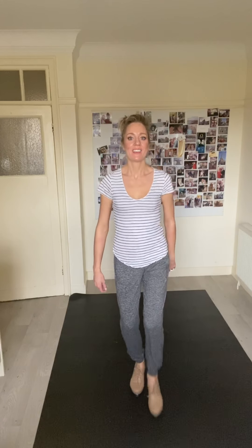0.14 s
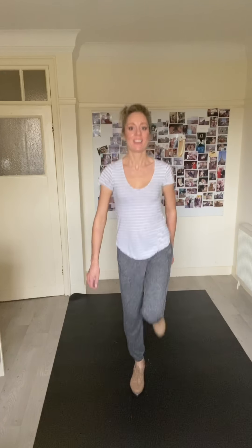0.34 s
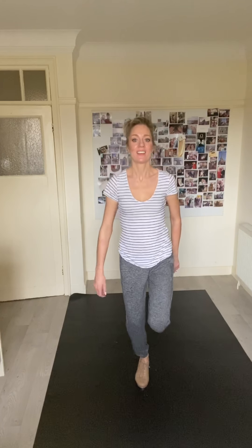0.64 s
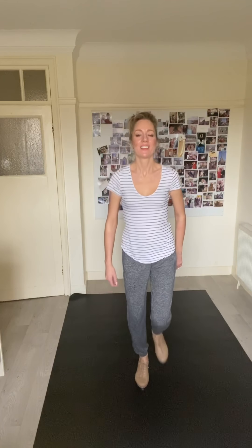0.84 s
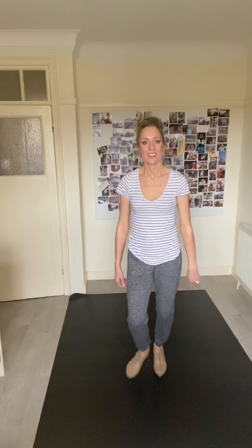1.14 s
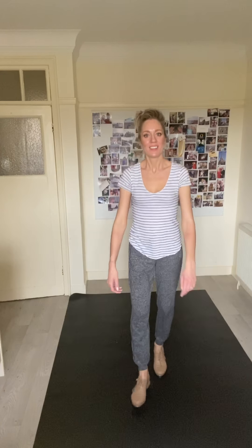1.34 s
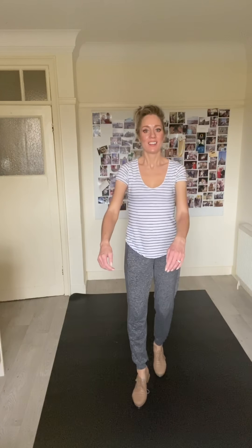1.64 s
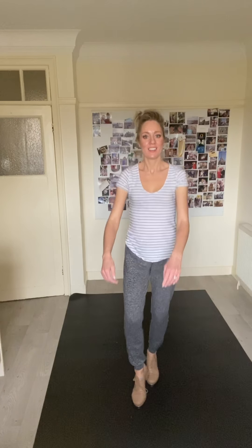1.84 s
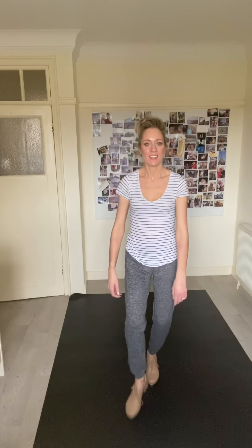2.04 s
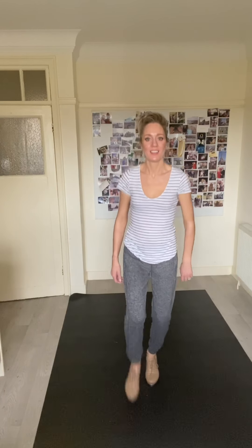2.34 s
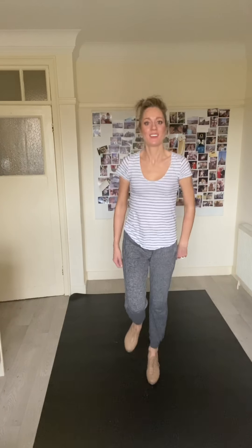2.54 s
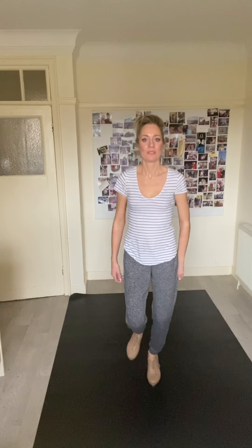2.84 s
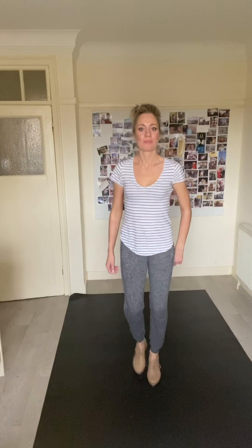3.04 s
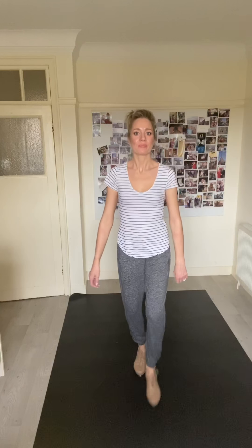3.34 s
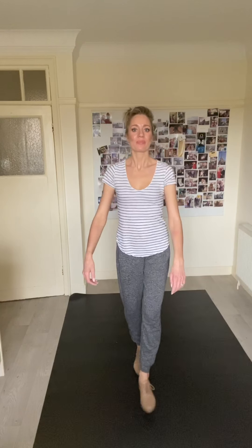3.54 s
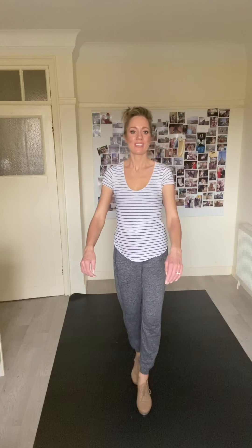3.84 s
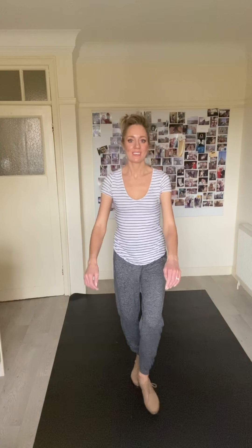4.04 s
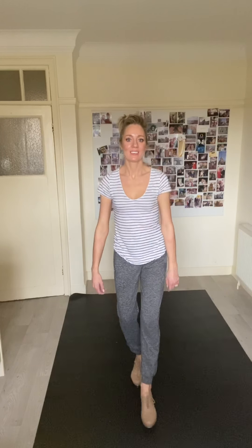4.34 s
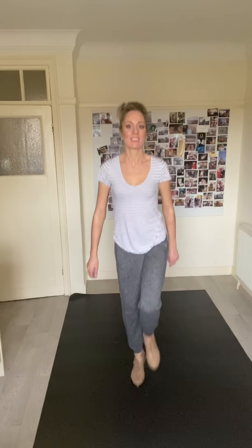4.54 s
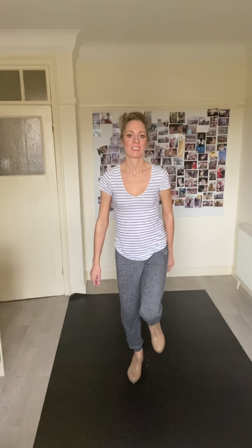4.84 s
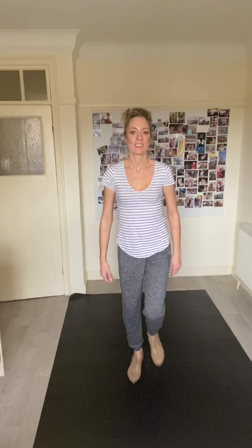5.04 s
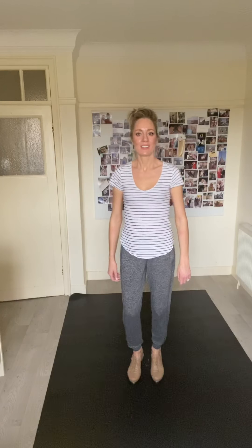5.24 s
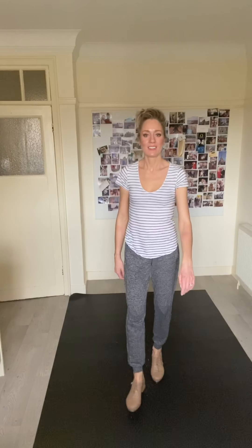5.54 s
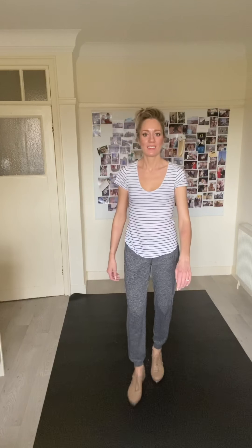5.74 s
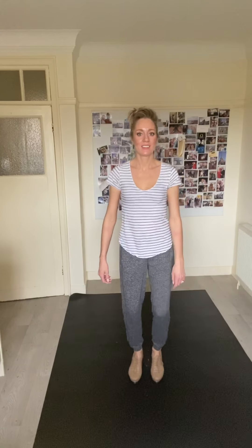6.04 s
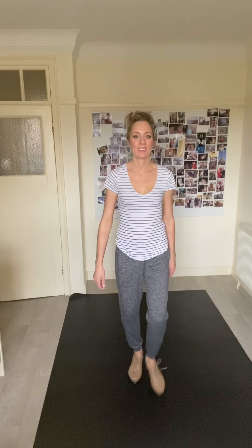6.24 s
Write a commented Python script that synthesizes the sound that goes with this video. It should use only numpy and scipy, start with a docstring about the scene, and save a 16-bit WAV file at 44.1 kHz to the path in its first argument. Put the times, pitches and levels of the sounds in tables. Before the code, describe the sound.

A dancer in tap shoes steps on a mat over a wooden floor in a small bare room. Single clacks come roughly every quarter second, with a few half-second gaps. Each has a crisp metal and leather snap, a boomy board thump and a short reverberant tail. A light brush and a soft landing thud come early and again late. A phone listens from a few metres away over a faint rumble.

```python
"""Tap shoes on a mat

A dancer in tap shoes steps on a mat over a wooden floor in a small bare room, a few metres from a phone.
Each blow clacks the metal plate and leather sole and shakes the boards; now and then her full weight lands.
Shoe and mat sounds are colours sent through random echoes; the floor is a set of fading sine waves.
The walls answer more loudly than the direct sound, over a faint house rumble, into two close microphones."""
import sys
import numpy as np
from scipy import signal
from scipy.fft import rfft, irfft
from scipy.io import wavfile

SR = 44100
rng = np.random.default_rng(int(sys.argv[2]) if len(sys.argv) > 2 else 0)


def inscribe(sig):
    """Save sig as 16-bit PCM at rate SR to the path in sys.argv[1].

    A 1-D sig is mono; a 2-D sig holds one channel per row.
    Samples are clipped to [-1, 1] before scaling.
    """
    pcm = np.round(np.clip(np.atleast_2d(sig).T, -1, 1) * 32767)
    wavfile.write(sys.argv[1], SR, pcm.astype(np.int16))


N = 281338

RING = np.arange(2 ** 15) / SR  # time after a blow (s)
RING_HZ = np.arange(len(RING) // 2 + 1) * SR / len(RING)  # pitches in the spectrum of that stretch

# Each blow's strength, then how far each part of the shoe stands out above it:
# [start_s, strength_db, body_weight_db, sole_clack_db, plate_ring_db, edge_tick_db]
TAPS = [(-.085, 17.5, -2, 7.5, -2, 8.5), (0.1708, 17.5, -2.5, 6, -0.5, 10), (.47, 14.5, 0, 3.5, 7.5, 7),
        (0.9697, 15, 4.5, 7, -0.5, 9), (1.2514, 16.5, 7, -2, 10.5, 9), (1.5107, 22.5, -3.5, -1, 5.5, 7.5),
        (1.7834, 18, -1.5, -5.5, -5, 3.5), (2.0226, 18.5, -8, 1.5, -2, -0.5),
        (2.2779, 27, 4, -1.5, -6.5, 1.5), (2.528, -3, 0.5, 3, -1.5, -2), (2.585, 18, 6, 4.5, 0.5, 5.5),
        (3.068, 25.5, -5.5, 0.5, -1, 4), (3.347, 18.5, -8, -3.5, 1, -3.5),
        (3.59, 28.5, -1.5, -0.5, 3, -0.5), (3.859, 21.5, -9, -9, -5, -3.5),
        (4.1192, 17, -11.5, 0, -3.5, .5), (4.3794, 25.5, 1, 0, -3, 4.5), (4.672, 11, 4.5, 2.5, -2, -2.5),
        (5.1663, 21, 4.5, 11, -1, 7.5), (5.4646, 21.5, -6, 2, -1, -6), (5.7516, 17.5, 2.5, .5, 6.5, 9.5),
        (5.9928, 21.5, 2.5, -5, 1, -2), (6.281, 18, -1.5, 3, -4.5, 4.5)]
# Ordinary sound of a shoe on the mat: [pitch_hz, level_db]
SHOE_COLOUR = [(60, -36), (160, -3.5), (240, -10), (350, -7), (520, -4.5), (800, -5), (1200, -1),
               (1900, 0.5), (2700, -4), (4200, -7.5), (5400, -16.5), (8500, -19.5), (11000, -25),
               (13500, -30.5), (15500, -37)]
# Short rings of the metal plates: [pitch_hz, width_hz, rise_db]
PLATE_RINGS = [(1146, 35, 3), (1585, 54, 4), (2460, 12, 6.5), (2680, 59, 1), (3393, 29, 6), (4003, 60, 3.5),
               (4480, 29, 5), (7040, 580, 3), (8280, 63, 6)]
# Where the weighted heel, sole, plate and edge speak, in that order: [pitch_hz, width_hz]
SHOE_PARTS = [(250, 550), (1830, 880), (3650, 3100), (10600, 7900)]


def taps():
    """Each blow rings heel, sole, plate and edge in its own measure, and fills the room."""
    out = np.zeros((2, N))
    shoe_db = curve(RING_HZ, SHOE_COLOUR)
    for hz, width_hz, rise_db in PLATE_RINGS:
        shoe_db = shoe_db + rise_db * resonance(hz, width_hz)
    parts = np.array([resonance(hz, width_hz) for hz, width_hz in SHOE_PARTS])
    for start_s, strength_db, *part_db in TAPS:
        colour_db = shoe_db + np.dot(part_db, parts) + strike_ripple()
        add(out, start_s, undb(strength_db) * heard(colour_db))
    return out


def strike_ripple(depth_db=4.5, width_share=0.043, count=36):
    """Where the plate is struck favours some of its many short modes and misses others (dB)."""
    place = rng.random((count, 1))
    size = rng.uniform(-1.04, 1, (count, 1))
    hz = 900 * 15 ** place  # from 900 to 13500 Hz
    return np.sum(depth_db * size * resonance(hz, width_share * hz), axis=0)


# The other shoe brushes the mat: [start_s, level_db, length_s]
BRUSHES = [(0.382, 2.5, 0.14), (4.598, 3.5, 0.1)]


def brushes():
    """A grazing shoe makes a short run of tiny contacts, each with the shoe's ordinary sound."""
    out = np.zeros((2, N))
    for start_s, level_db, length_s in BRUSHES:
        swell = RING * np.exp(-2 * RING / length_s)
        contacts = unit(rng.laplace(size=(1, len(RING))) * swell)
        shoe = heard(curve(RING_HZ, SHOE_COLOUR))
        add(out, start_s, undb(level_db) * signal.fftconvolve(contacts, shoe))
    return out


# The body's weight comes down or pushes off; the floor uses these too: [start_s, push_db, push_length_s]
LANDINGS = [(0.357, -41, 0.0066), (0.497, -18, 0.016), (1.3, -25, 0.014), (1.818, -28, 0.011),
            (2.30, -32, .01), (3.875, -35.5, 0.0039), (4.586, -29.5, 0.0183), (4.706, -15.5, 0.0086)]
# Muffled thud of the mat under a landing: [pitch_hz, level_db]
MAT_COLOUR = [(30, -24), (70, -7), (130, -0.5), (250, -15), (450, -22), (800, -35), (2000, -44.5),
              (8000, -89)]


def mat(thud_db=56.5, stiffening=1.43):
    """The mat slaps dully under a landing; it stiffens under load, so gentle pushes stay almost silent."""
    out = np.zeros((2, N))
    for start_s, push_db, _ in LANDINGS:
        # stiffening: dB of slap per dB of push
        add(out, start_s, undb(stiffening * push_db + thud_db) * heard(curve(RING_HZ, MAT_COLOUR)))
    return out


# Bending modes of the boards; t60 is the time to fade by 60 dB: [pitch_hz, level_db, t60_s, build_up_s]
BOARDS = [(80.4, 1, 0.18, 0.0037), (97.3, -2, 0.41, 0.021), (129.9, 1, .2, 0.007),
          (143.6, -3, 0.46, 0.0074), (157.5, -9.5, 0.82, 0.0091), (178.6, -11.5, 0.1, 0.0066),
          (206, -10.5, 0.33, 0.0088), (220, -18, 0.18, 0.0009), (306.3, -14.5, 0.81, 0.011),
          (462, -7, 0.27, 0.0028), (568, -13, 0.74, 0.0033), (661, -11, 0.61, 0.0029)]
# The joists sway and pump the room's lowest modes: [pitch_hz, level_db, t60_s, build_up_s]
JOISTS = [(44.2, -21, 0.49, .04), (53.77, 1, 0.37, 0.062), (56.8, 2, 0.3, 0.032), (69, 3.5, 0.14, 0.023)]


def floor(board_lag_s=0.00845, joist_lag_s=0.0172, reach_per_db=.14, landing_board_db=-3):
    """Taps shake the boards, then the heavy joists; a landing is a slow push on the low modes."""
    board_db, joist_db = -49.5, -53
    give = .9  # dB gained per dB of force
    out = np.zeros(N)
    for start_s, strength_db, weight_db, *_ in TAPS:
        force_db = give * (strength_db + weight_db)
        boards = ring(BOARDS, reach_per_db * strength_db)
        add(out, start_s + board_lag_s, -undb(force_db + board_db) * boards)
        add(out, start_s + joist_lag_s, undb(force_db + joist_db) * ring(JOISTS))
    for start_s, push_db, length_s in LANDINGS:
        push = np.sin(np.pi * np.minimum(RING / length_s, 1))
        body = ring(JOISTS) + undb(landing_board_db) * ring(BOARDS)
        add(out, start_s, undb(push_db) * signal.fftconvolve(body, push / push.sum()))
    shared = rfft(out)
    return microphones(np.array([shared, 0 * shared]))


def ring(modes, upper_db=0, upper_hz=170, detune=0.013, scatter_db=2.64):
    """Modes build up and die away, a little different each time, scaled to one fixed energy."""
    hz, level_db, t60_s, build_s = np.transpose(modes)[:, :, None]
    pitch_chance, size_chance = rng.standard_normal((2, len(modes), 1))
    envelope = unit((1 - np.exp(-RING / build_s)) * np.exp(-np.log(1000) * RING / t60_s))
    waves = envelope * np.sin(2 * np.pi * hz * (1 + detune * pitch_chance) * RING)
    # a harder blow reaches the modes just above the main thud
    reach = (hz > upper_hz) * (hz < 2 * upper_hz)
    sizes = undb(level_db + upper_db * reach + scatter_db * size_chance)
    return unit(np.sum(sizes * waves, axis=0)) * np.sqrt(SR / 7)  # rms 1 if packed into 1/7 s


# Steady sound of the house: [pitch_hz, level_db_per_hz], shape only
HOUSE_COLOUR = [(20, -12.5), (50, -2), (100, -2), (160, -15.5), (300, -20.5), (1000, -29), (3000, -39.5),
                (6000, -48), (15000, -84)]


def house(level_db=-49):
    """A faint steady rumble under everything, made of coloured noise."""
    noise = rfft(rng.standard_normal((2, N)))
    hz = np.linspace(0, SR / 2, noise.shape[-1])
    out = microphones(noise * undb(curve(hz, HOUSE_COLOUR)))
    return out * undb(level_db) / out.std()


def heard(colour_db):
    """A blow of this colour, through the room to both microphones."""
    fade = np.clip(4 * (1 - RING / RING[-1]) - .5, 0, 1)  # ends the tail smoothly
    return fade * microphones(causal(colour_db) * room())


# How long the room takes to fade by 60 dB: [pitch_hz, t60_s]
ROOM_T60 = [(150, 0.48), (450, 0.58), (1100, 0.51), (2200, 0.52), (4500, 0.48), (8000, 0.41), (14000, 0.32)]
# Sound arriving after a blow, before decay; wall reflections bunch up near 15 ms: [time_s, level_db]
ARRIVALS = [(0, -2.5), (.004, -1), (.010, 1.5), (.0142, 6), (.02, 6.5), (.035, 4), (.07, 4)]


def room(spiky=0.88, merge_s=0.042, direct=1.5, early_s=0.0047,
         crack_db_per_octave=6, crack_s=0.0048, crack_hz=4500):
    """Spectra of the paths from one spot on the floor: direct sound, distinct reflections, then a dense tail."""
    grain, size = rng.standard_normal((2, 2, len(RING)))
    # single reflections stand out early, then merge
    spread = spiky * np.exp(-RING / merge_s) * np.minimum(RING / early_s, 1)
    paths = grain * np.exp(spread * size - spread ** 2)
    paths[0, 0] = direct
    paths = rfft(paths * undb(np.interp(RING, *np.transpose(ARRIVALS))))
    points, t60s = np.transpose(ROOM_T60)
    out = 0
    # each pitch band fades at its own pace
    for share, hz, t60_s in zip(np.eye(len(points)), points, t60s):
        band = curve(RING_HZ, np.c_[points, share])
        # what has not yet met a wall keeps more of its treble: the crack of the plate
        octaves = max(np.log2(hz / crack_hz), 0)
        fresh = undb(crack_db_per_octave * octaves * np.exp(-(RING / crack_s) ** 2))
        out = out + irfft(paths * band) * fresh * np.exp(-np.log(1000) * RING / t60_s)
    return rfft(unit(out))


# The microphone pair; likeness runs from 0 to 1: [pitch_hz, likeness, left_lead_rad, left_minus_right_db]
MICROPHONE_PAIR = [(50, .99, -.15, -2.5), (160, .85, -.1, -9), (320, .4, 1.6, -11), (520, .8, 2.5, -7),
                   (950, .7, 2.6, 1), (1300, .6, 3.2, 1.5), (2050, .35, 4.9, 3), (2700, .55, 2.6, 1),
                   (3800, .2, 3, 2.5), (4400, .5, 3.8, 0), (5300, .99, 3.2, 0), (5700, .99, 3, 0),
                   (6400, .85, 2.7, 0), (8000, .82, 1.57, 0), (9700, .99, 0, 0), (11600, .99, 0, 0),
                   (13000, .8, -1.5, 0), (15500, .95, -3.1, 0)]


def microphones(fields):
    """Two unrelated sound-field spectra become left and right; both microphones share the first."""
    hz = np.linspace(0, SR / 2, fields.shape[-1])
    points, *columns = np.transpose(MICROPHONE_PAIR)
    alike, lead, balance_db = (np.interp(hz, points, column) for column in columns)
    alike = np.clip(alike, 0, 1)
    right = alike * np.exp(-1j * lead) * fields[0] + np.sqrt(1 - alike ** 2) * fields[1]
    ratio = undb(balance_db)
    left = fields[0] * ratio
    return irfft(np.array([left, right]) * np.sqrt(2 / (1 + ratio ** 2)))


def causal(db):
    """Time-ordered spectrum of the quickest-dying response that has this colour."""
    cepstrum = irfft(np.log(undb(db)))
    half = len(cepstrum) // 2
    cepstrum[1:half] *= 2
    cepstrum[half + 1:] = 0
    return np.exp(rfft(cepstrum))


def resonance(hz, width_hz):
    """A bell-shaped peak of height 1."""
    return 1 / (1 + (2 * (RING_HZ - hz) / width_hz) ** 2)


def curve(hz, table):
    """Read (Hz, value) points on a log-frequency axis."""
    points, values = np.transpose(table)
    return np.interp(np.log(hz + 1), np.log(points), values)


def undb(db):
    """Decibels to gain."""
    return 10 ** (np.asarray(db) / 20)


def unit(x):
    """Scale to energy 1."""
    return x / np.sqrt(np.sum(x ** 2, axis=-1, keepdims=True))


def add(out, start_s, x):
    """Mix x into out from start_s on, leaving off whatever falls outside."""
    start = int(round(start_s * SR))
    lo, hi = max(start, 0), min(start + x.shape[-1], N)
    out[..., lo:hi] += x[..., lo - start:hi - start]


def scene():
    """Shoes, mat, floor and the quiet house."""
    return taps() + brushes() + mat() + floor() + house()


def record(dry, low_hz=36, order=4, top_hz=15500):
    """The phone thins the deepest bass, rounds the highest peaks and cuts the top."""
    bass_cut = signal.butter(order, low_hz, "high", fs=SR, output="sos")
    rounded = np.tanh(signal.sosfilt(bass_cut, dry))
    top_cut = signal.ellip(10, .2, 80, top_hz, fs=SR, output="sos")  # 0.2 dB ripple, 80 dB cut
    return signal.sosfilt(top_cut, rounded)


dry = scene()
out = record(dry)
inscribe(out)
```